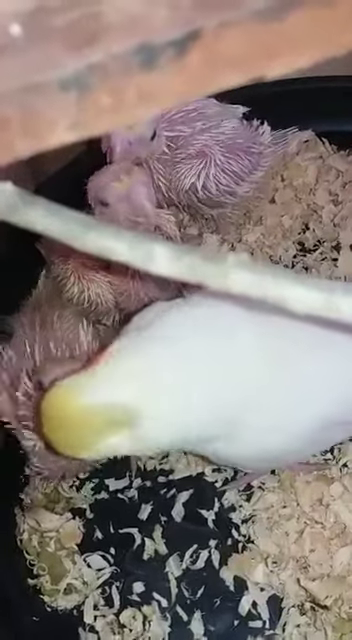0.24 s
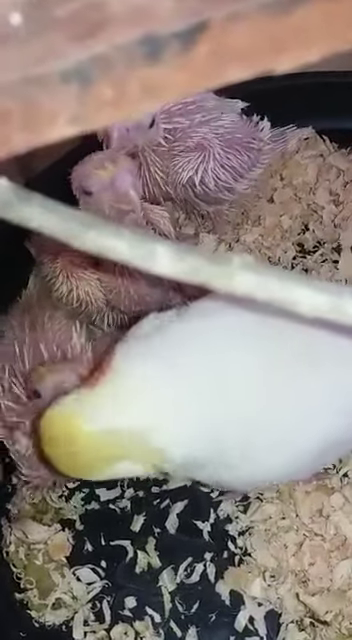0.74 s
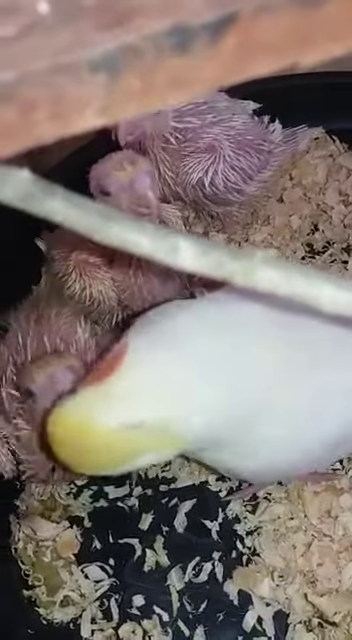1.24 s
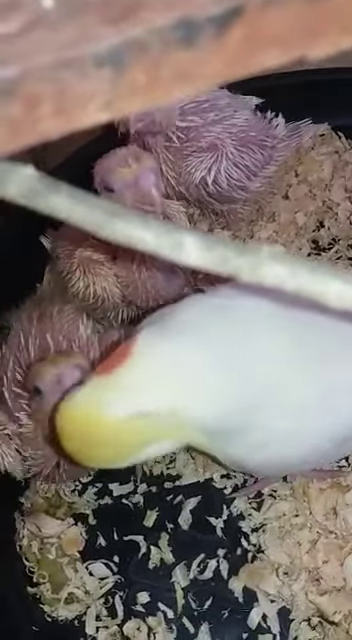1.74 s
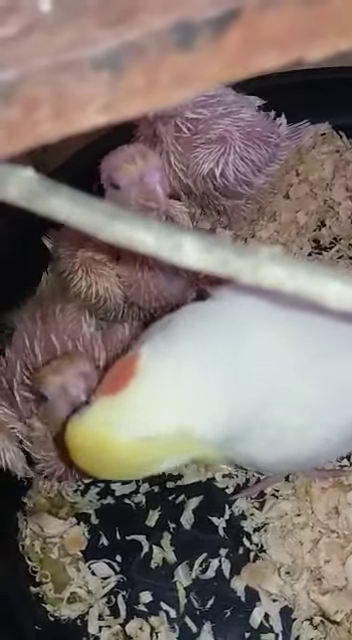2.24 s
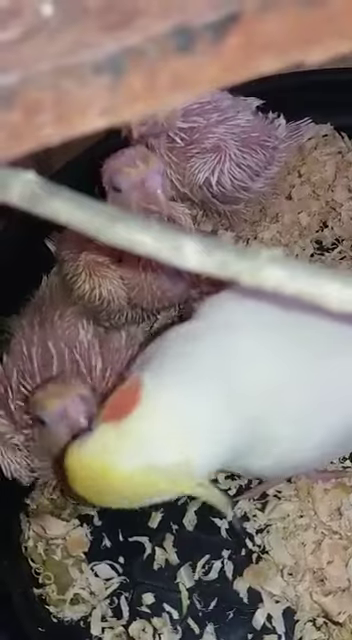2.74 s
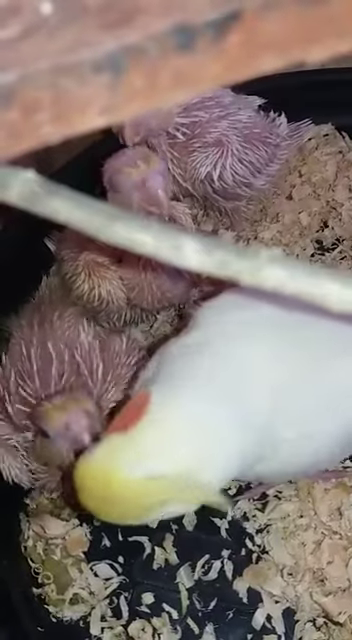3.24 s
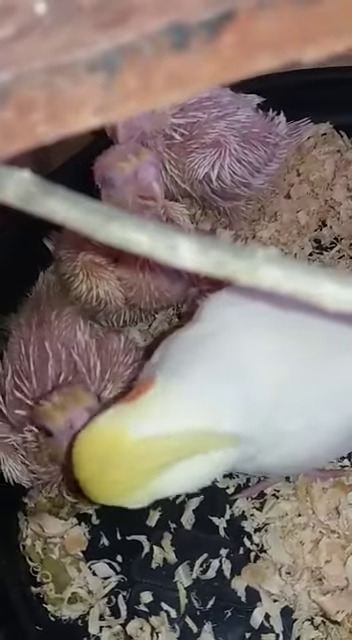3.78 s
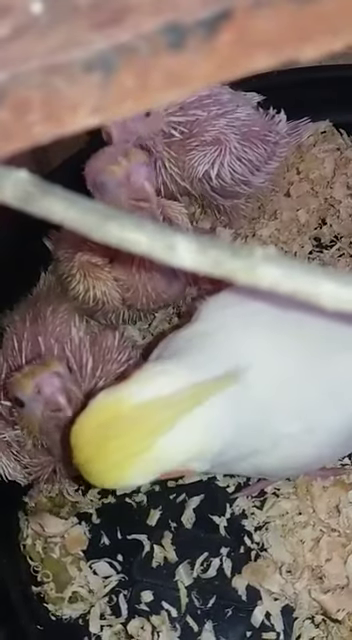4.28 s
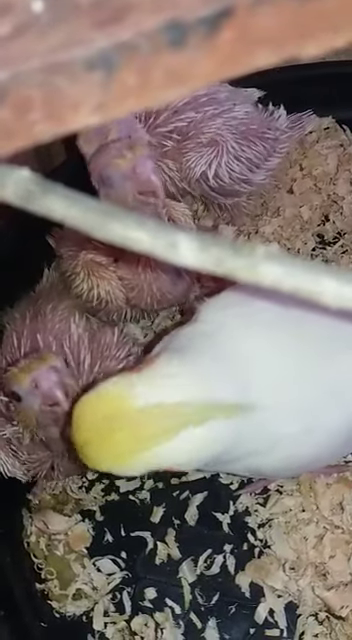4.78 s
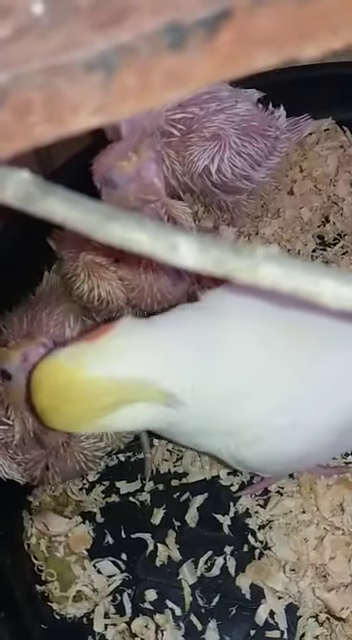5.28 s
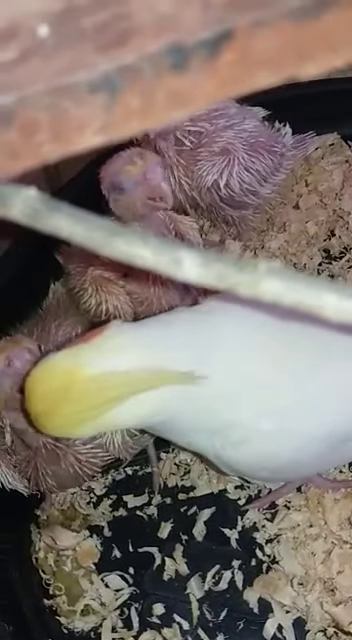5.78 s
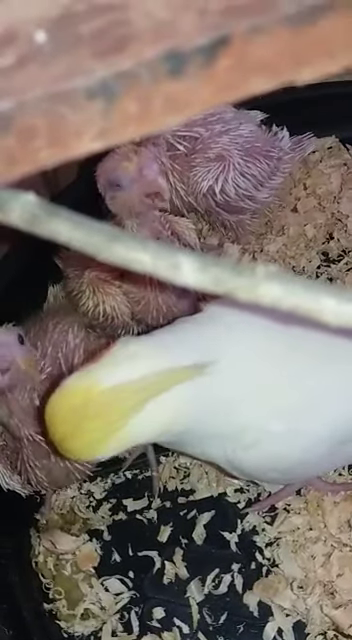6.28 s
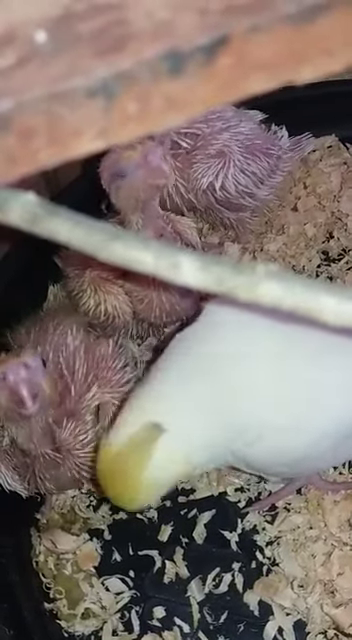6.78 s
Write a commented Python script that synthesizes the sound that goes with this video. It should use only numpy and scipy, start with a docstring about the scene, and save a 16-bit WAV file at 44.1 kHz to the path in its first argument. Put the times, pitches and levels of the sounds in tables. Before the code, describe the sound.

A low, faint hum and rush of far traffic runs throughout. From 0 to 3.3 s a small bird gives tiny, sharp, high chips, often about six a second with some gaps. A young parrot starts with a weak blip at 0.57 s and a softer churr at 0.7, then loud hoarse begging trills at 1.1, 1.6, 2.05 and 2.5 s, each about 0.25 s, fluttering very fast between high and lower pitch and sinking at the end. Small dry litter ticks fall near 2.1 and 3.2-3.4 s. At 3.5 s a brief bird whistle meets a short squawk; stronger, raspier churrs follow at 3.7, 4.1, 4.6, 5.0 and 5.5 s. After 5.85 s only traffic remains until clipped, weaker squawks at 6.6, 6.8 and 6.95 s. A soft, throbbing dove coo begins at 6.9 s and is cut off. Hard walls blur the birds; the phone microphone dulls the highs.

```python
"""Far traffic hums and a small bird chips close by while a young parrot begs in fast hoarse trills.
The parrot's pitch swings up and down about 28 times a second, and hard walls smear it into a harsh churr.
Gliding tones, torn by fast chance where they are hoarse, make the voices; shaped noise and one wavering
tone make the traffic, and short noise bursts the dry ticks. A dove starts to coo near the end.
Parrot, small bird and ticks pass through a microphone that is dull above 6.5 kHz."""
import sys
import numpy as np
from scipy import signal
from scipy.fft import rfft, irfft, next_fast_len
from scipy.io import wavfile
from scipy.ndimage import uniform_filter1d, map_coordinates

SR = 44100
rng = np.random.default_rng(int(sys.argv[2]) if len(sys.argv) > 2 else 0)


def generate_wav(sig):
    """Save sig (samples, or channels by samples) to the path in sys.argv[1] as 16-bit PCM at SR."""
    pcm = np.round(np.clip(np.atleast_2d(sig).T, -1, 1) * 32767).astype(np.int16)
    wavfile.write(sys.argv[1], SR, pcm)


N = 309524

# traffic, rush raised 1 dB in the mix: (time [s], rumble level [dB], rush level [dB])
TRAFFIC_LEVELS = [(0.0, -47.5, -51), (0.47, -50.5, -53.5), (5.67, -50, -52.5), (6.27, -48.5, -54.5),
                  (7.02, -49.5, -51)]
# colour of the engine rumble: (frequency [Hz], relative level [dB])
RUMBLE_SPECTRUM = [(20, -55.5), (38, -38.5), (52, -5), (110, -4), (180, -4.5), (290, -5), (320, -43.5),
                   (420, -12.5), (600, -53.5)]
# colour of the tyre rush: (frequency [Hz], relative level [dB])
RUSH_SPECTRUM = [(200, -25.5), (320, -7.5), (520, -7), (1270, -16), (1700, -13.5), (2600, -18.5),
                 (4000, -22.5), (6000, -33.5), (8000, -47.5), (9500, -92)]
# one far engine note: (time [s], pitch [Hz], level [dB])
ENGINE_NOTE = [(0, 188.4, -49), (.5, 189.7, -60), (5.6, 188.5, -53), (6, 186.2, -47), (6.5, 187.9, -53),
               (7.02, 189, -54)]
# the dove's first note: (time [s], pitch [Hz], level [dB])
DOVE_COO = [(6.86, 520, -71), (6.89, 517, -43), (6.94, 566, -46), (6.97, 550, -57), (7.02, 547, -47)]
# small dry ticks in the litter: (time [s], level before a 10 dB trim [dB])
LITTER_TICKS = [(3.1841, -52.5), (3.16, -61), (3.3889, -37), (2.1, -30)]
# one longer whistle of the small bird: (time [s], pitch [Hz], level [dB])
BIRD_WHISTLE = [(3.45, 3750, -50.5), (3.47, 5070, -51), (3.483, 5960, -39), (3.5, 4750, -45),
                (3.53, 3900, -46.5), (3.55, 3550, -47)]
# chips: (time of the drop [s], shelf pitch [Hz], shelf length [s], climb top pitch [Hz],
#  climb level [dB], drop level [dB])
BIRD_CHIPS = [(.061, 6000, 0.013, 6320, -43, -30.5), (0.22, 6000, 0.0055, 6060, -43, -33),
              (0.389, 5400, 0.0036, 7160, -51, -41), (.555, 6200, 0.011, 6140, -75, -57),
              (1.071, 5900, 0.0062, 7500, -45.5, -26.5), (1.255, 6200, 0.008, 6636, -38, -26),
              (1.611, 5300, 0.0078, 6500, -34.5, -33.5), (1.78, 5300, .008, 6500, -43, -30.5),
              (1.946, 6200, 0.0062, 6170, -37, -28), (2.107, 6100, 0.009, 6880, -37, -29),
              (2.438, 5700, 0.012, 7140, -37, -27), (2.611, 5800, 0.011, 7360, -33.5, -32),
              (2.786, 5720, 0.0084, 7300, -34, -48), (2.94, 5350, 0.011, 6980, -33.5, -31.5),
              (3.111, 5700, 0.0073, 7270, -38.5, -32.5), (3.295, 7000, 0.0073, 6980, -38.5, -38)]
# begging calls; the accent is the swing at the count time, if that falls inside the call:
# (start [s], first swing [s], time the swings are counted from [s], last swing [s],
#  accent pitch [Hz], top pitch bent to after it [Hz], top pitch of the last swing [Hz],
#  top level before the accent [dB], accent level [dB], top level after it [dB],
#  loudest dip level [dB], overtone level [dB], lowest pitch of the ending [Hz], sinking time [s])
BEGGING_CALLS = [(0.565, 0.586, 0.586, 0.586, 2882, 2916, 2870, -39.5, -41.5, -39.5, -42, -28.5, 1794, .03),
                 (0.706, 0.728, 0.760, 0.96, 3356, 2782, 2450, -46, -37, -34.5, -34.5, -25, 1534, 0.043),
                 (1.108, 1.148, 1.216, 1.402, 3309, 2952, 2820, -27, -19.5, -29, -39, -24, 1477, .045),
                 (1.594, 1.623, 1.696, 1.877, 3270, 2890, 2846, -22.5, -21, -29.5, -42, -25.5, 1475, 0.019),
                 (2.045, 2.078, 2.21, 2.302, 3272, 2852, 2720, -22.5, -22.5, -29, -42, -25.5, 1411, .05),
                 (2.519, 2.544, 2.6, 2.792, 3142, 2905, 2873, -25, -27, -29, -37, -27.5, 1200, .045),
                 (3.535, 3.566, 3.566, 3.566, 3400, 3400, 3410, -42, -37, -42, -42.5, -25.5, 1680, .04),
                 (3.698, 3.746, 3.8, 3.925, 3296, 2817, 2453, -25.5, -21, -29, -33.5, -22, 1620, 0.063),
                 (4.115, 4.146, 4.217, 4.371, 3322, 2844, 2566, -24, -17, -25.5, -36.5, -23, 1448, 0.04),
                 (4.567, 4.606, 4.66, 4.823, 3360, 2950, 2430, -18.5, -16, -26, -34, -22, 1521, 0.048),
                 (5.029, 5.064, 5.12, 5.29, 3384, 2757, 2473, -27.5, -18, -28.5, -33, -23, 1302, .04),
                 (5.49, 5.515, 5.74, 5.776, 3260, 2666, 2443, -24, -26.5, -27.5, -33, -23, 1429, 0.054),
                 (6.631, 6.657, 6.55, 6.657, 2907, 2913, 2901, -37, -35.5, -31.5, -42, -31.5, 1818, .025),
                 (6.793, 6.813, 6.8, 6.848, 3162, 3163, 3158, -27, -37, -25, -48, -30, 1830, .025),
                 (6.963, 6.983, 7.17, 7.014, 3390, 3374, 3380, -29, -32, -29, -50, -30.5, 2000, .041)]
# lowest pitch between the tops: (time [s], dip pitch [Hz])
DIP_PITCH = [(1.05, 1907), (1.3, 1731), (2.9, 1726), (3.7, 1890), (5.8, 1894)]
# partials above the overtone: (multiple of the pitch, level relative to the overtone [dB])
UPPER_PARTIALS = [(3, -12.5), (4, -23), (5, -30)]
# a low undertone breaks in during one call: (time [s], pitch [Hz], level [dB])
LOW_UNDERTONE = [(5.578, 1500, -54), (5.6, 1545, -48), (5.65, 1566, -57), (5.7, 1718, -44),
                 (5.73, 1790, -49)]
# how long the walls ring: (frequency [Hz], time to fall 60 dB [s])
YARD_DECAY = [(1500, 0.4), (6000, 0.32), (10000, 0.52)]
# throat and microphone colour: (frequency [Hz], gain [dB])
THROAT_AND_MIC = [(1150, 7), (1500, 12.5), (3200, 0.5), (3600, 1.5), (4100, 5), (4600, 0), (5300, 4),
                  (6300, -10), (7200, -11), (8500, -21), (12000, -26), (15000, -22)]

SWING_S = .0362  # usual length of a swing
SAG_SHAPE = .8  # exponent of the bend of the tops after the count time
DIP_SWELL_DB = 3.5  # the dips gain this much each swing
OVER_START_DB, OVER_CLOSES = 12.5, 0.7  # overtone's opening gap; share of it left after each swing
SCATTER_DB, SCATTER_PITCH = 1.2, .008  # chance from swing to swing: level, share of the pitch
OPENING, OPENING_DB = 1.01, 8.5  # first lead-in swing: top as a share of the accent pitch, dB under the rest
FADE_TOP_DB, FADE_DIP_DB, FADE_OVER_DB = 3.5, 2, 4  # the last swing is weaker
CLEARING = 0.74  # share of the slides' roughness shed over a call
FIRST_DIP = .8  # dip of the first swing as a share of its top pitch
SILENT_DB = -120
TOP_HZ = 15720  # band limit of the phone


def amp(db):
    """Gain of a level in dB."""
    return 10 ** (np.asarray(db) / 20)


def unit(x):
    """x at rms 1."""
    return x / np.sqrt(np.mean(x ** 2) + 1e-20)


def along(points, hz):
    """Read (Hz, value) points on a log frequency axis."""
    f, v = np.transpose(points)
    return np.interp(np.log(hz + 1), np.log(f + 1), v)


def curves(rows):
    """One value per sample for each column after the time."""
    s, *cols = np.transpose(rows)
    return [np.interp(np.arange(N) / SR, s, c) for c in cols]


def wobble(rate):
    """A smooth random curve, rate knots a second."""
    knots = rng.standard_normal(int(N * rate / SR) + 4)
    return map_coordinates(knots, [np.arange(N) * rate / SR])


def filtered(x, response):
    """x times a response of frequency."""
    m = next_fast_len(N + SR // 2)
    return irfft(rfft(x, m) * response(np.fft.rfftfreq(m, 1 / SR)), m)[..., :N]


def tone(hz, db, rough=0, rasp_rate=600):
    """A sine of moving pitch and rms level; fast chance tears a share of it into a rasp around the pitch."""
    share = np.clip(rough, 0, 1)
    size = np.sqrt(1 - share) + np.sqrt(share) * unit(wobble(rasp_rate))
    level = uniform_filter1d(amp(db), size=90)
    return np.sqrt(2) * level * size * np.sin(2 * np.pi * np.cumsum(hz) / SR)


def sung(rows):
    """Pitch and level curves from (s, Hz, dB) rows, silent outside them."""
    (start, hz, _), (end, last_hz, _) = rows[0], rows[-1]
    before, after = (start - .004, hz, SILENT_DB), (end + .004, last_hz, SILENT_DB)
    return curves([before] + list(rows) + [after])


def coloured_noise(spectrum):
    """Noise shaped to a spectrum, at rms 1."""
    return unit(filtered(rng.standard_normal(N), lambda hz: amp(along(spectrum, hz))))


def traffic():
    """Far engines and tyres: a lumpy rumble, a rush and one wavering engine note."""
    rumble_db, rush_db = curves(TRAFFIC_LEVELS)
    rumble = amp(rumble_db + 0.2 * wobble(8.8)) * coloured_noise(RUMBLE_SPECTRUM)
    rush = amp(rush_db + 1.0 + .8 * wobble(9.4)) * coloured_noise(RUSH_SPECTRUM)
    hz, db = curves(ENGINE_NOTE)
    engine = tone(hz * (1 + 0.015 * wobble(13)), db, rough=0.27, rasp_rate=51)
    return rumble + rush + engine


def dove():
    """A soft, throbbing low note: a sine that wavers in pitch and level."""
    hz, db = sung(DOVE_COO)
    return tone(hz * (1 + 0.018 * wobble(60)), db + 3 * wobble(45))


def ticks():
    """Dry cracks: noise bursts that fade at 60 dB per 19 ms, cut after 600 samples."""
    out, t = np.zeros(N + SR), np.arange(600) / SR
    for s, db in LITTER_TICKS:
        burst = amp(db - 10.0 - 60 * t / 0.019) * rng.standard_normal(len(t))
        out[round(s * SR):][:len(t)] += burst
    return out[:N]


def small_bird():
    """A chip: one side of the syrinx climbs, the other holds a shelf and then drops about an octave."""
    whistle = tone(*sung(BIRD_WHISTLE), rough=.25, rasp_rate=590)
    climbs, drops = [], []  # knots (s, Hz, dB)
    for s, shelf_hz, shelf_s, top_hz, climb_db, drop_db in BIRD_CHIPS:
        start = s - shelf_s
        climbs += [(start - .024, 4000, SILENT_DB),
                   (start - .021, 4200, climb_db - 19.0),
                   (start - .012, .78 * top_hz, climb_db),
                   (start - .007, .9 * top_hz, climb_db - 0.5),
                   (start - .003, top_hz, climb_db),
                   (start + 0.0069, top_hz, climb_db - 3.0),
                   (start + 0.016, top_hz, SILENT_DB)]
        drops += [(start - .003, .96 * shelf_hz, SILENT_DB),
                  (start, .97 * shelf_hz, drop_db),
                  (s, shelf_hz, drop_db),
                  (s + 0.0026, 4100, drop_db + 1.0),
                  (s + .007, 3200, drop_db - 12.5),
                  (s + .007 + 0.0017, 2900, SILENT_DB)]
    climb_hz, climb_db = curves(climbs)
    climbing = tone(climb_hz, climb_db + 4 * wobble(160), rough=0.24, rasp_rate=1200)
    dropping = tone(*curves(drops), rough=0.028, rasp_rate=1900)
    return whistle + climbing + dropping


def swings(first_s, count_s, last_s, accent_hz, bent_hz, last_hz,
           lead_db, accent_db, later_db, dip_db, over_db):
    """Rows (s, top Hz, top dB, dip dB, overtone dB): tops bend after count_s; dips and overtone grow."""
    before = round((count_s - first_s) / SWING_S)  # swings before count_s; negative if it precedes the call
    after = round((last_s - count_s) / SWING_S)
    k = np.arange(before + after + 1)
    chance = rng.standard_normal((len(k), 4))
    first, last, leading = k == 0, k == k[-1], k < before
    lead_period = (count_s - first_s) / max(before, 1)
    later_period = (last_s - count_s) / max(after, 1)
    s = count_s + (k - before) * np.where(leading, lead_period, later_period)
    bend = (np.clip(k - before, 0, None) / max(after - 1, 1)) ** SAG_SHAPE
    lead_hz = np.where(first, OPENING, 1) * accent_hz
    hz = np.where(leading, lead_hz, accent_hz + (bent_hz - accent_hz) * bend)
    hz[-1] = last_hz
    top = np.where(k == before, accent_db, later_db - FADE_TOP_DB * last)
    top = np.where(leading, lead_db - OPENING_DB * first, top)
    dip = dip_db - DIP_SWELL_DB * np.clip(k[-1] - 1 - k, 0, None) - FADE_DIP_DB * last
    over = over_db - OVER_START_DB * OVER_CLOSES ** k - FADE_OVER_DB * last
    levels = np.transpose([top, dip, over]) + SCATTER_DB * chance[:, 1:]
    return np.column_stack([s, hz * (1 + SCATTER_PITCH * chance[:, 0]), levels])


def screech_knots():
    """Each swing holds its top pitch, dives to the dip and climbs back softly, hoarser while it slides."""
    knots = []  # (s, Hz, dB, overtone dB, roughness 0-1)
    for start_s, *voicing, low_hz, sink_s in BEGGING_CALLS:
        rows = swings(*voicing)
        for k, (s, top_hz, top_db, dip_db, over_db) in enumerate(rows):
            first, last = k == 0, k == len(rows) - 1
            dip_hz = np.interp(s, *np.transpose(DIP_PITCH))
            if first and not last:  # the first swing barely dives
                dip_hz = FIRST_DIP * top_hz
            # the voice locks in after one swing
            top_rough, dip_rough = (.7, .9) if first else (.04, 0.34 * (1 - CLEARING * k / len(rows)))
            if first:  # the call opens breathy, near its top pitch
                knots += [(start_s - .003, top_hz, SILENT_DB, SILENT_DB, .95),
                          (start_s, top_hz, top_db - 13, over_db - 16.5, .95)]
            knots += [(s - .007, .97 * top_hz, top_db - 5.5, over_db, top_rough),
                      (s + .004, top_hz, top_db, over_db, top_rough)]
            if last:  # the last swing sinks away
                end = s + 1.2 * sink_s
                knots += [(s + 0.42 * sink_s, 1.1 * dip_hz, dip_db, over_db, .12),
                          (s + .75 * sink_s, 1.03 * low_hz, dip_db - 11, over_db - 8, .35),
                          (end, low_hz, dip_db - 22, over_db - 14, .5),
                          (end + .012, low_hz, SILENT_DB, SILENT_DB, .3)]
            else:  # the overtone is faint on the climb
                period = rows[k + 1, 0] - s
                knots += [(s + .36 * period, 1.1 * dip_hz, dip_db, over_db, dip_rough),
                          (s + .54 * period, dip_hz, dip_db, over_db, dip_rough),
                          (s + .66 * period, 1.25 * dip_hz, dip_db + 0.5, over_db - 6.5, dip_rough)]
    return knots


def screech():
    """The parrot's syrinx: a swinging pitch with a strong overtone, upper partials and rushing air."""
    hz, db, over_db, rough = curves(screech_knots())
    hz = uniform_filter1d(hz, size=180)  # muscles round the corners of the swing
    hz = hz * (1 + (.006 + 0.01997 * rough) * wobble(400))
    voice = tone(hz, db + 1.0 * wobble(250), 0.77 * rough)
    overtone_db = over_db - 12 * rough + 2.6 * wobble(300)
    voice += tone(2 * hz, overtone_db, rough + 0.077, rasp_rate=800)
    # air rushes past a slack syrinx
    voice += tone(np.full(N, 4300), over_db - 17 * (1 - rough), rough=1.0, rasp_rate=4200)
    for multiple, level_db in UPPER_PARTIALS:
        partial_db = over_db + level_db + 3 * wobble(300)
        voice += tone(multiple * hz, partial_db, rough + .2, rasp_rate=1200)
    return voice + tone(*sung(LOW_UNDERTONE), rough=0.05)


def nearby_walls(x, echo_db):
    """The sound and forty weaker copies from close surfaces within 25 ms."""
    answer = np.zeros(SR // 20)
    delay_s = rng.uniform(0.00091, .025, size=40)
    sign = rng.choice([-1, 1], size=40)
    answer[np.round(delay_s * SR).astype(int)] = sign * amp(echo_db - 330 * delay_s)
    answer[0] = 1
    return signal.fftconvolve(x, answer)[:N]


def yard(x, gap_s):
    """The walls answer after a gap with a noise tail; each frequency dies at its own speed."""
    hz, t, z = signal.stft(rng.standard_normal(SR // 2), SR, nperseg=256)
    decay = amp(-60 * t / along(YARD_DECAY, hz)[:, None])
    tail = signal.istft(z * decay, SR, nperseg=256)[1]
    delayed = np.pad(x, (round(gap_s * SR), 0))
    return signal.fftconvolve(delayed, tail / np.linalg.norm(tail))[:N]


def scene():
    """Parrot, small bird and ticks through walls and microphone colour, over the dove and traffic."""
    hum, coo = traffic(), dove()
    near, far = small_bird() + ticks(), screech()
    birds = nearby_walls(near, echo_db=-20) + amp(-13.5) * yard(near, gap_s=0.0082)
    birds += amp(-4) * nearby_walls(far, echo_db=-11) + amp(-3.5) * yard(far, gap_s=0.0086)
    coloured = filtered(birds, lambda hz: amp(along(THROAT_AND_MIC, hz)))
    return (coloured + coo + hum)[None]


def record(dry):
    """The phone adds its own faint hiss and keeps nothing above its band limit."""
    hiss = amp(-78.5) * rng.standard_normal(dry.shape)
    return filtered(dry + hiss, lambda hz: hz < TOP_HZ)


dry = scene()
out = record(dry)
generate_wav(out)
```